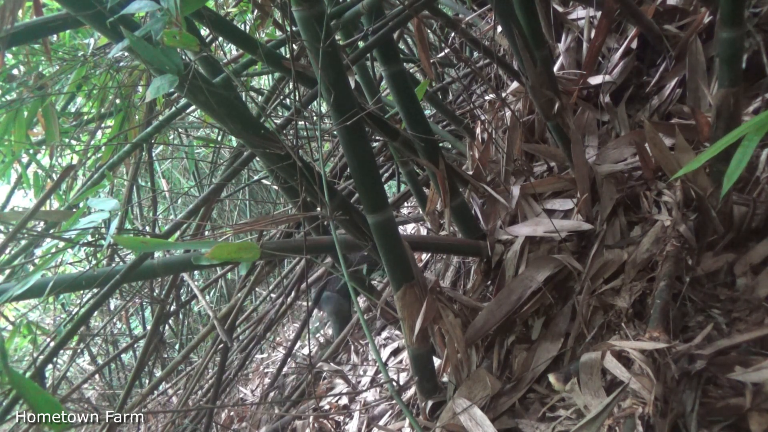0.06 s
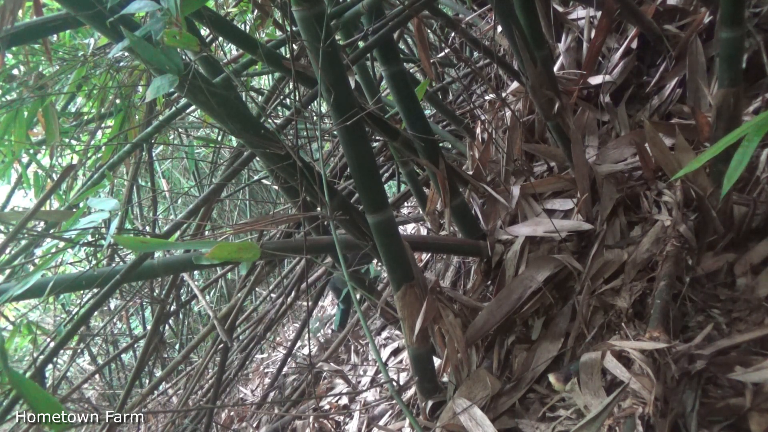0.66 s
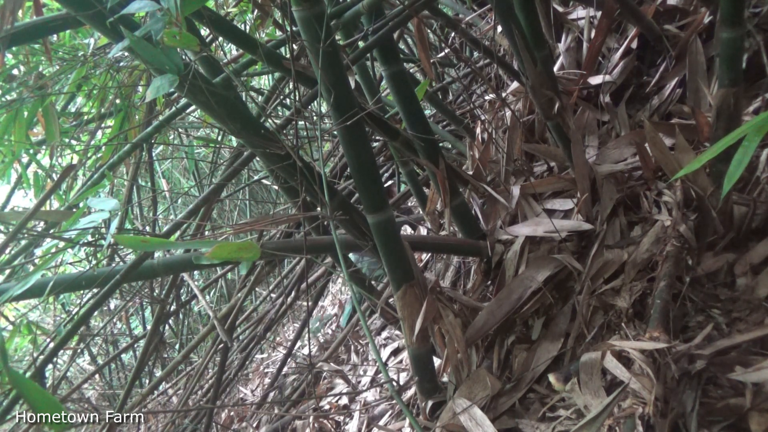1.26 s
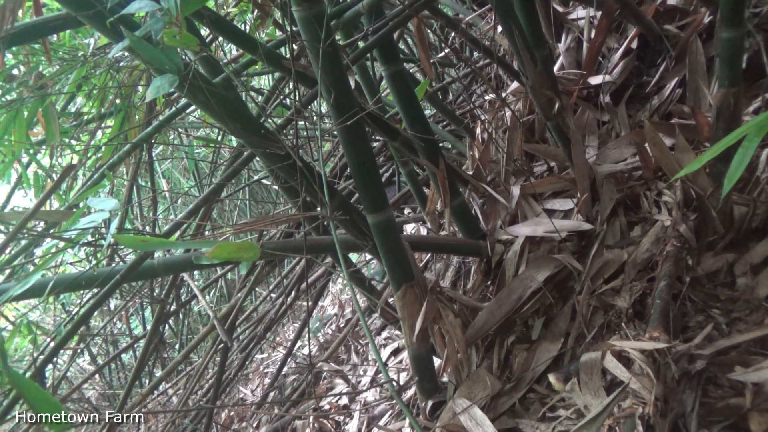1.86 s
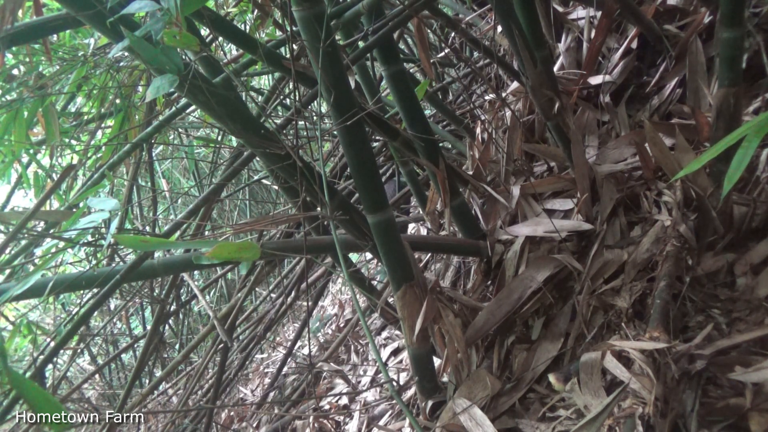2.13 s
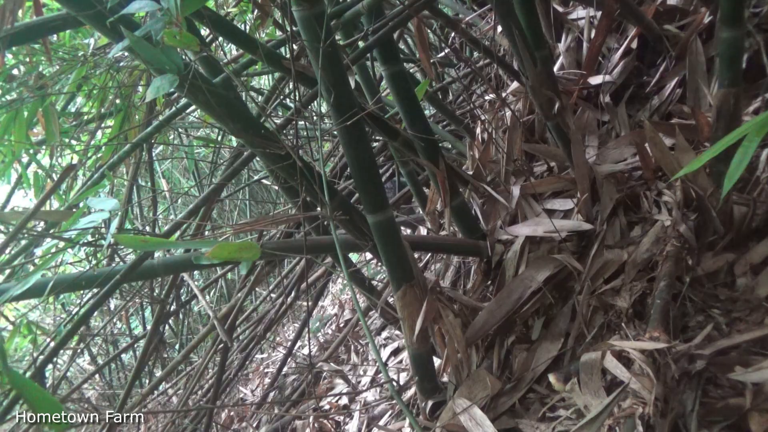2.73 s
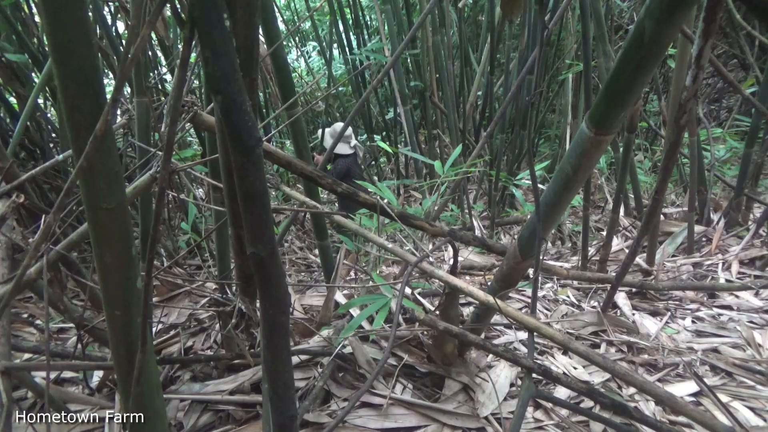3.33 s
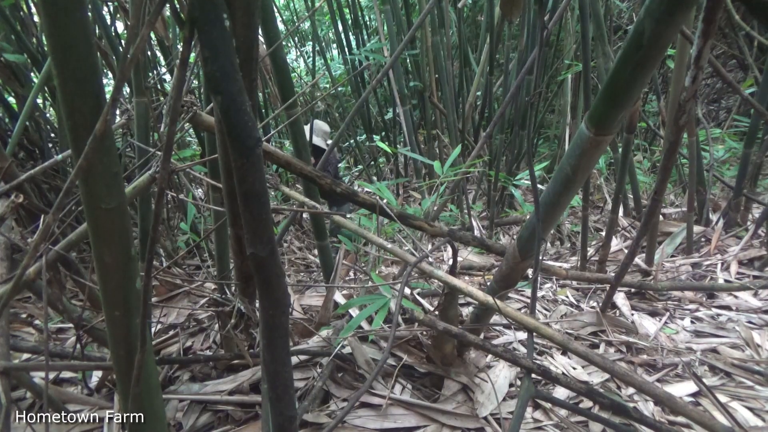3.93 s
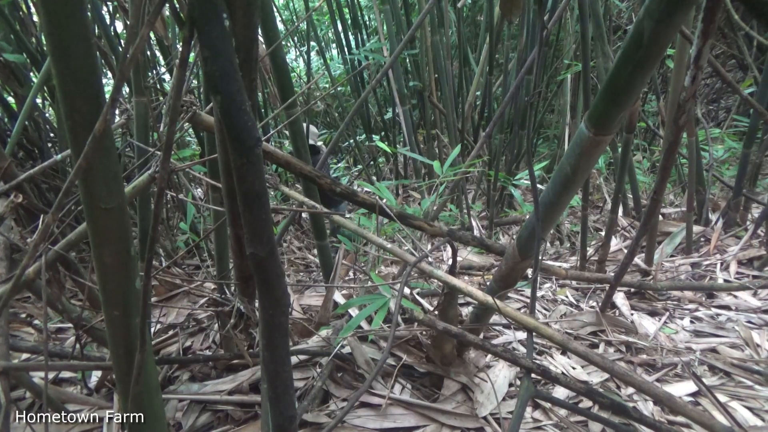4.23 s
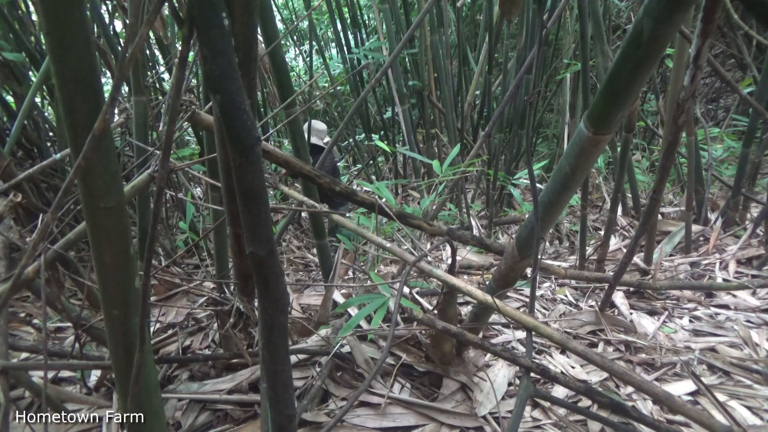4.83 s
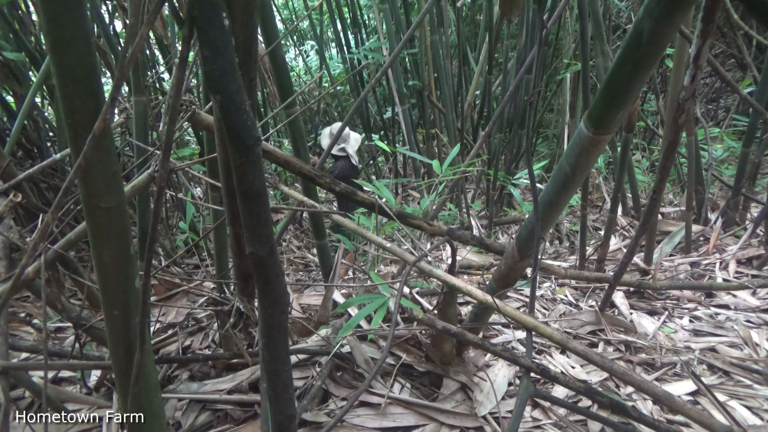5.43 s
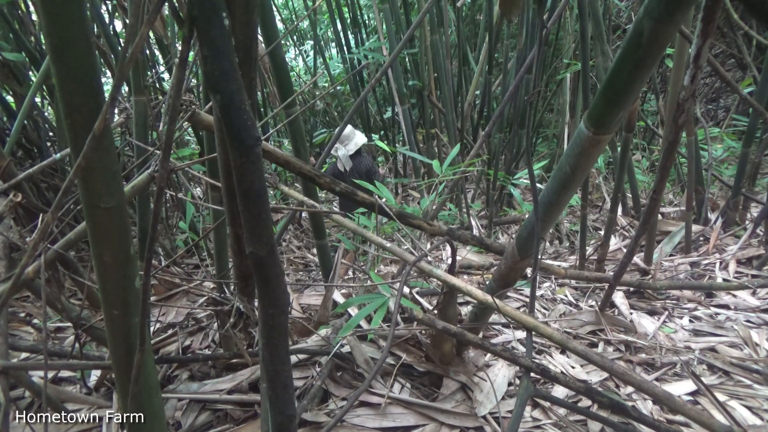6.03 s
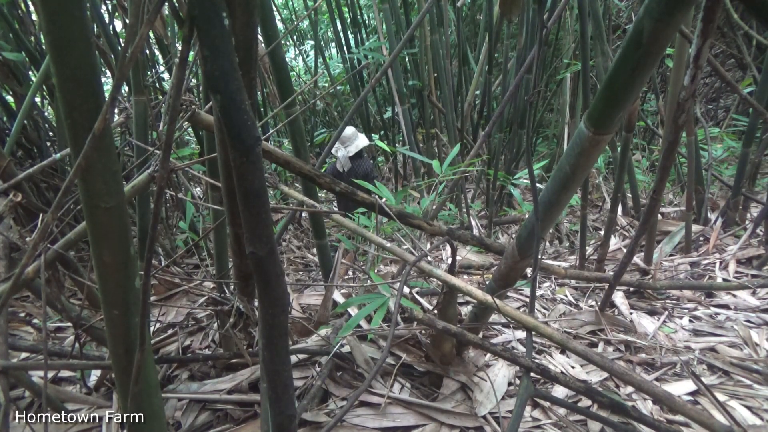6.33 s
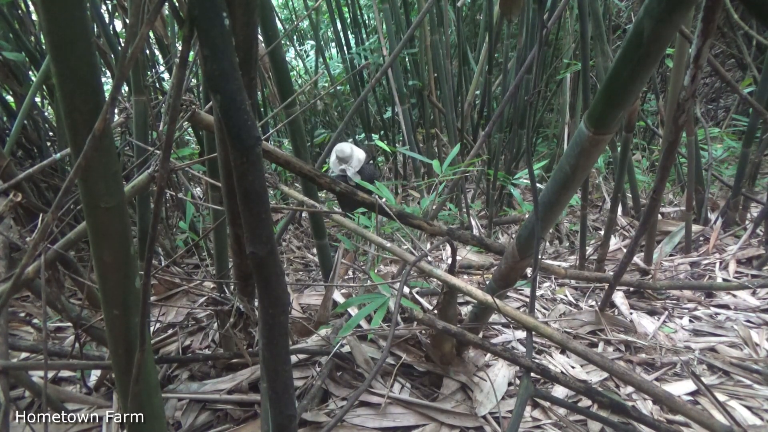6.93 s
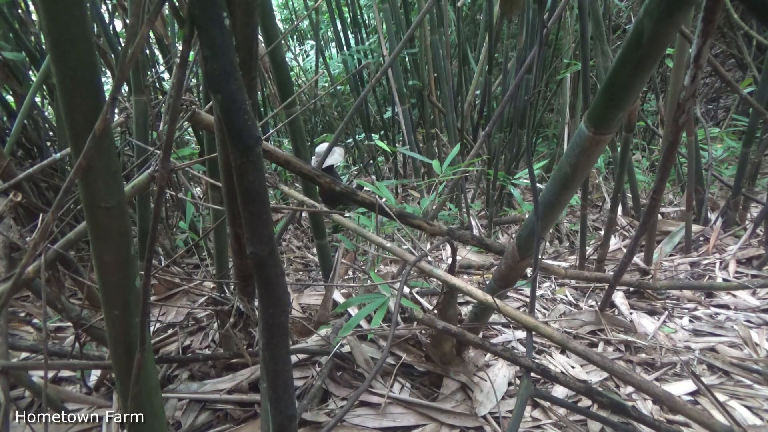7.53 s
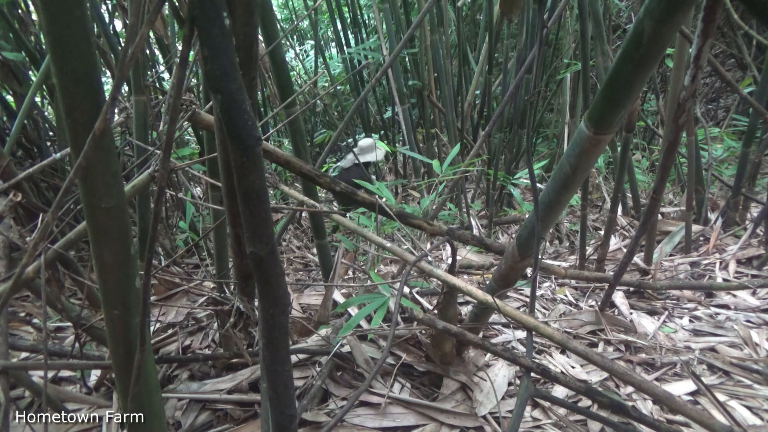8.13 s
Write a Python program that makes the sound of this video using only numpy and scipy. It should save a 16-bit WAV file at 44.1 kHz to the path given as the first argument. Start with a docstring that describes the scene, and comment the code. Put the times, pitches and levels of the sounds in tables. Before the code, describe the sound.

A high insect drone hangs over a bamboo grove as footsteps crunch through dry leaves some metres ahead, with sharp twig snaps and soft thuds. The background shifts slightly and a far bird begins whistling downward. Then a dry cane splinters loudly, groaning briefly as it splits, and the steps carry on with more rustling and cracking. The standing stems give each snap a short echo.

```python
"""Someone pushes through a bamboo grove some metres away: dry leaves rustle, twigs snap, feet thud.
After about 3 s the level dips briefly, the background shifts, and a far bird starts to whistle downward.
Midway a dead cane breaks, and its hollow groans upward as the split opens. Then the steps go on.
All along, insects drone high up and the standing canes scatter the sounds into short echoes."""
import sys
import numpy as np
from scipy import signal
from scipy.fft import rfft, irfft, next_fast_len
from scipy.io import wavfile
from scipy.ndimage import uniform_filter1d

SR = 44100
rng = np.random.default_rng(int(sys.argv[2]) if len(sys.argv) > 2 else 0)


def dump_mix(stems):
    """Bounce the given channels to the path in sys.argv[1] as a 16-bit WAV at rate SR."""
    frames = np.atleast_2d(stems).T  # one column per channel
    limited = np.clip(frames, -1, 1)  # hard clip at full scale
    pcm = np.round(limited * 32767).astype(np.int16)
    wavfile.write(sys.argv[1], SR, pcm)


N = 360297
TIME = np.arange(N) / SR

# steps and shoves through dry litter: (start [s], time pressing [s], leaf hiss [dB], stalk crunch [dB])
PUSHES = [(-0.2, 0.32, -44, -54), (0.235, 0.15, -39, -57.5), (0.52, 0.0092, -42, -50.5),
          (0.669, 0.061, -39, -49.5), (1.25, 0.11, -48.5, -53.5), (1.42, 0.14, -48.5, -60),
          (1.745, 0.021, -38, -55), (1.865, 0.057, -39, -51), (2.43, 0.15, -48, -66),
          (2.805, 0.11, -47, -79), (3.03, 0.043, -52, -57), (3.108, 0.026, -40, -54.5),
          (3.2, 0.047, -40, -52.5), (4.46, 0.034, -52.5, -54), (4.64, 0.068, -30, -35.5),
          (4.92, 0.07, -41.5, -43.5), (5.316, 0.021, -35.5, -44), (5.44, 0.041, -45.5, -69),
          (6.2, 0.17, -41.5, -53), (6.42, 0.058, -39, -49), (6.66, .2, -39, -54), (6.97, 0.046, -38.5, -51),
          (7.08, 0.25, -42, -53), (7.41, 0.19, -42, -56), (7.72, 0.17, -42, -55), (7.92, 0.031, -42.5, -51)]
# litter stirring between steps: (start [s], end [s], leaf hiss [dB], stalk crunch [dB])
STIRS = [(0, 2.7, -52, -68), (3.1, 17, -60.5, -68.5)]
# tone of dry leaves and of crushed stalks: (frequency [Hz], level [dB])
LEAF_TONE = [(500, -40), (2500, -16.5), (4300, -6.5), (5800, 0), (6700, -1.5), (8000, -4.5), (10000, -2.5),
             (12500, -8), (16000, -15.5)]
STALK_TONE = [(25, -38), (70, -5), (170, 2.5), (300, -3), (700, -1), (1200, -0.5), (2000, 3.5), (3200, 2),
              (5000, -2.5), (9000, -27)]
# twigs snapping: (time [s], crack [dB], woody knock [dB], splinter pitch [Hz], tearing time [s])
TWIG_SNAPS = [(0.529, -31, -51, 5940, .0037), (0.551, -25, -46, 6800, 0.0043),
              (0.694, -28.5, -49, 10100, 0.0078), (0.7257, -31, -49, 7140, 0.0024),
              (1.1372, -47, -65, 9800, .001), (1.636, -34, -54, 12000, 0.0022),
              (1.648, -25, -47, 6200, 0.0033), (1.7458, -16, -26, 4840, 0.0033),
              (2.812, -37, -58, 6350, .003), (3.2215, -25, -45, 9900, .0057),
              (4.1352, -40, -56, 7500, .0015), (6.268, -32.5, -43, 8050, .0045),
              (6.301, -25, -44, 6700, .0052), (6.492, -28, -42, 5800, 0.0093),
              (6.8259, -16, -39.5, 10300, 0.00069), (6.8406, -18.5, -54, 10200, 0.00043),
              (6.909, -28.5, -46, 6700, 0.0019), (7.019, -27.5, -44, 6170, .0023),
              (7.274, -28, -51, 9900, .0015), (7.309, -24.5, -41, 10300, .0027),
              (7.852, -30, -54, 7500, .001), (7.8652, -24, -55, 6240, 0.0018),
              (7.931, -29.5, -38, 5070, .001), (8.052, -32.5, -45, 9100, .0007),
              (8.1225, -37.5, -53, 9350, .0012)]
# the dead cane giving way:
# (time [s], crack [dB], woody knock [dB], splinter pitch [Hz], knock pitch [Hz], tearing time [s])
CANE_CRACKS = [(4.6313, -14, -23.5, 9200, 2210, 0.0024), (4.6517, -17, -23, 5300, 1150, .0028),
               (4.6543, -32, -14, 5700, 1780, 0.0054), (4.68, -17, -26, 5600, 1150, 0.0014),
               (4.6825, -20, -15, 5800, 1750, .009), (4.7289, -18, -30, 9500, 2530, .0014),
               (4.781, -24, -31, 6000, 1580, 0.0047), (4.825, -29, -26.5, 5700, 1820, 0.0052),
               (4.85, -32, -27, 5260, 1100, .01), (4.8907, -24, -34.5, 5360, 1150, 0.003),
               (4.921, -46, -28, 5160, 1680, .003), (4.9404, -35, -27, 5230, 1870, 0.0038),
               (4.9825, -31, -42, 8650, 2140, .0018), (5.1252, -24, -20.5, 6900, 1900, 0.0046)]
# stems tapping each other: (time [s], level [dB], knock pitch [Hz])
STEM_TAPS = [(1.043, -42.5, 2980), (1.2, -44, 1000), (2.18, -43.5, 2900), (2.663, -44.5, 2540)]
# tone of a crack: (frequency [Hz], level [dB])
CRACK_TONE = [(300, -16), (1500, -26), (3500, -5), (6000, 3), (9500, 4), (12000, 3.5), (16000, -5)]
# how the cane's cracks lose their highest treble over distance: (frequency [Hz], level [dB])
DISTANT_CRACK_TONE = [(8000, 1), (11000, -1.5), (15000, -19)]
# where the body of a dry cane rings: (pitch [Hz], width [Hz], level [dB])
CANE_RINGS = [(1110, 68, -2.5), (1630, 360, 3.5), (2730, 1060, 5.5), (4100, 640, 3.5)]
# the knocks carry little bass: (frequency [Hz], level [dB])
KNOCK_LOW_CUT = [(100, -9), (400, -3), (900, -2)]
# the split sticks and slips: (start [s], length [s], level [dB])
SPLIT_SLIPS = [(4.772, 0.079, -42.5), (4.886, 0.0096, -40), (4.92, 0.036, -43.5), (4.979, 0.061, -40.5),
               (5.065, 0.029, -56)]
# footfalls and knocks on soft ground: (time [s], level [dB], pitch [Hz], time to fade by 60 dB [s])
THUDS = [(1.748, -50, 139, 0.15), (4.656, -51, 112, 0.22), (4.685, -58, 181, 0.29),
         (5.127, -36, 226, 0.076), (6.5, -49, 125, .14), (6.535, -50, 72, 0.11), (7.03, -38.5, 375, 0.029),
         (7.31, -41, 222, 0.05)]
# bird calls: (start [s], length [s], level [dB], top pitch [Hz])
BIRD_CALLS = [(3.69, 0.3, -52, 4066), (4.462, 0.42, -49, 4195), (6.661, .28, -52, 4100),
              (7.474, 0.32, -52.5, 4050)]
# shape of one call: (way through [0 to 1], pitch [share of the top pitch], level [dB])
CALL_SHAPE = [(0, 0.99, -2), (.25, .86, 0.5), (.55, .79, -0.5), (.78, .67, 1), (.9, .61, 1), (1, .55, -6)]
# insect drones: (pitch [Hz], width [Hz], level by the bamboo clump [dB], level in the open grove [dB])
INSECTS = [(5190, 730, -60.5, -62), (4970, 750, -65, -58.5), (5800, 1200, -73, -72),
           (7060, 270, -74, -65.5)]
# tone of the air, its extra tint in the open grove, and tone of far leaves: (frequency [Hz], level [dB])
AIR_TONE = [(25, -23), (47, -10.5), (130, 0), (200, 1), (370, 0), (600, -5.5), (1300, -8.5), (2400, -9.5),
            (3300, -17)]
OPEN_AIR_TINT = [(200, -1.5), (400, 0.5), (800, 2), (2000, 1)]
FAR_LEAF_TONE = [(1500, -49), (2600, 7), (4200, 4.5), (6000, 11.5), (10000, 1.5), (13000, -7), (16000, -1)]
# how long the grove echoes: (frequency [Hz], time to fade by 60 dB [s])
ECHO_FADE = [(200, 1), (1500, 0.34), (5000, 0.38), (10000, 0.23), (16000, 0.11)]
# tone of the echoes: (frequency [Hz], level [dB])
ECHO_TONE = [(200, -26), (1500, -7), (5000, -4), (10000, -4.5), (16000, 4)]
# tone of the side signal, which makes the sound wide: (frequency [Hz], level [dB])
SIDE_TONE = [(100, -16), (300, -14.5), (700, -11.5), (1800, -33), (3500, -61), (6500, -17), (9000, -13),
             (12000, -34.5)]
# the low notes lean left: (frequency [Hz], left over right [dB])
LEFT_LEAN = [(100, 0), (350, 1.3), (1200, 0)]

SHIFT_S = 3.105  # the background switches from the clump to the open grove


def rustle(hiss, crunch, flutter_db=1.05, tick_db=-7):
    """Countless leaf edges brush in a fine fizz, a few tick alone, and thin stalks crunch below."""
    pitches = np.linspace(3000, 15000, 7)
    fizz = sum(resonate(clicks(5000, 2.0), hz, 3600) * gain_of(2.63 * wander(45)) for hz in pitches)
    ticks = sum(resonate(clicks(70, 2.8), hz, 2500) for hz in pitches)
    leaves = evened(coloured(evened(fizz) + gain_of(tick_db) * evened(ticks), LEAF_TONE))
    stalks = evened(coloured(clicks(1400, 4.2), STALK_TONE))
    return (leaves * hiss + stalks * crunch) * gain_of(flutter_db * wander(70))


def litter_levels(curve=0.55, settle_db=-15):
    """Loudness of leaves and of stalks: each push swells, springs back and settles, over a faint stir."""
    power = np.zeros((2, N))
    for start, length, hiss_db, crunch_db in PUSHES:
        push = swell(start, length, curve, fade_db_per_s=118)
        settling = gain_of(settle_db) * swell(start, length, curve, fade_db_per_s=25)
        power += gain_of([[hiss_db], [crunch_db]]) ** 2 * (push ** 2 + settling ** 2)
    for start, end, hiss_db, crunch_db in STIRS:
        power += gain_of([[hiss_db], [crunch_db]]) ** 2 * ((TIME >= start) & (TIME < end))
    return np.sqrt(power)


def snaps(twig_knock_hz=2230, tap_s=0.0023):
    """Twigs crack brightly, the dead cane cracks with a woody body, and touching stems only knock."""
    out = np.zeros(N)
    for start, crack_db, knock_db, splinter_hz, length in TWIG_SNAPS:
        fibres = tear(length)
        knock_hz = twig_knock_hz * np.exp(rng.uniform(-0.03, 0.03))
        add(out, start, crack(fibres, crack_db, splinter_hz) + knock(fibres, knock_db, knock_hz))
    for start, crack_db, knock_db, splinter_hz, knock_hz, length in CANE_CRACKS:
        fibres = tear(length)
        far_crack = coloured(crack(fibres, crack_db, splinter_hz), DISTANT_CRACK_TONE)
        add(out, start, far_crack + knock(fibres, knock_db, knock_hz))
    for start, db, knock_hz in STEM_TAPS:
        add(out, start, knock(tear(tap_s), db, knock_hz))
    return out


def tear(length, rise_s=0.0002):
    """Wood fibres part in one quick, harsh burst; a few hold on longer."""
    t = np.arange(4096) / SR
    fibres = np.tanh(rng.standard_normal(len(t)) / 0.15) * (1 - np.exp(-t / rise_s))
    stragglers = 0.25 * np.exp(-t / (3.7 * length))
    return fibres * (np.exp(-(t / length) ** 2) + stragglers)


def crack(fibres, db, hz, ring_db=11):
    """The parting fibres make a splinter ring brightly."""
    ringing = fibres + gain_of(ring_db) * resonate(fibres, hz, width=2000)
    return burst(coloured(np.roll(ringing, 16), CRACK_TONE), db)


def knock(fibres, db, hz, stem_width_hz=170, stem_db=4.0, kick=2.4):
    """The break kicks the stem and the cane behind it; a thin stem knocks high and barely stirs a cane."""
    push = np.diff(fibres, prepend=0)
    push[0] += kick
    thin_loss_db = 20 * max(np.log2(hz / 1750), 0)
    rings = [(f, width, level - thin_loss_db) for f, width, level in CANE_RINGS]
    rings.append((hz, stem_width_hz, stem_db))
    body = sum(gain_of(level) * evened(resonate(resonate(push, f, width), f, f))
               for f, width, level in rings)
    padded = np.pad(body, (0, len(body)))
    return burst(coloured(padded, KNOCK_LOW_CUT)[:len(body)], db)


def groan(start_s=4.77, opening_s=0.35, shut_hz=381, open_hz=573, wall_db=-12, rasp_db=-9):
    """Fibres slip in the split and sound the cane's hollow, which rises in pitch as it opens."""
    opening = np.clip((TIME - start_s) / opening_s, 0, 1) ** 0.66  # fast at first, then slower
    pitch = shut_hz + (open_hz - shut_hz) * opening
    cycles = np.cumsum(pitch * (1 + 0.06 * wander(250))) / SR
    slips = np.diff(np.floor(cycles), prepend=0) * gain_of(2.9 * wander(300))  # one click a cycle
    rough = np.interp(TIME, [4.95, 5.02], [0.7, 0.3])  # ragged slips settle into a steady squeak
    rubbing = (1 - rough) * evened(slips - slips.mean()) + rough * evened(clicks(650, 2.5))
    hollow = resonate(resonate(rubbing, pitch, 130), pitch, 130)
    hollow /= np.sqrt(abs(uniform_filter1d(hollow ** 2, size=900)) + 1e-12)  # steadies its loudness
    wall = evened(resonate(resonate(rubbing, 1126, 85), 1060, 80))
    rasp = evened(resonate(rubbing, 1970, 600))
    level = sum(gain_of(db) * swell(start, length, curve=0.5, fade_db_per_s=752)
                for start, length, db in SPLIT_SLIPS)
    return level * (hollow + gain_of(wall_db) * wall + gain_of(rasp_db) * rasp)


def thuds(rise_s=0.0015):
    """Soft ground answers a step or knock with a short, dull thump."""
    out, t = np.zeros(N), np.arange(SR // 2) / SR
    for start, db, hz, fade_s in THUDS:
        cycles = np.cumsum(hz * (1 + 0.35 * wander(hz)[:len(t)])) / SR  # loose litter has no clean pitch
        level = gain_of(db - 60 * t / fade_s) * (1 - np.exp(-t / rise_s))
        add(out, start, level * np.sin(2 * np.pi * cycles))
    return out


def bird(flutter_db=2):
    """A wavering whistle that slides down, blurred by its long way through the canes."""
    out = np.zeros(N)
    way, slide, shape_db = np.transpose(CALL_SHAPE)
    for start, length, db, top_hz in BIRD_CALLS:
        n = int(length * SR)
        progress = np.linspace(0, 1, n)
        pitch = top_hz * np.interp(progress, way, slide) * (1 + 0.022 * wander(260)[:n])
        level = gain_of(db + np.interp(progress, way, shape_db) + flutter_db * wander(93.4)[:n])
        add(out, start, level * signal.windows.tukey(n, 0.1) * np.sin(2 * np.pi * np.cumsum(pitch) / SR))
    return out


def grove_echoes(sounds, paths_per_s=7000, rise_s=0.0005):
    """Standing canes on three sides scatter what reaches them; the paths change as the source moves."""
    out, t = np.zeros(N), np.arange(SR * 3 // 4) / SR
    for direction, sound in enumerate(sounds):
        bounces = rng.standard_normal(len(t)) * (rng.random(len(t)) < paths_per_s / SR)
        bounces *= 1 - np.exp(-t / rise_s)
        hz, age, bands = signal.stft(bounces, SR, nperseg=256)
        fade = gain_of(-60 * age / value_at(ECHO_FADE, hz)[:, None])
        tail = signal.istft(bands * fade, SR, nperseg=256)[1]
        share = np.cos(np.pi * (7 * TIME + direction / 3)) * np.sqrt(2 / 3)  # the sides take turns
        out += signal.fftconvolve(sound * share, tail / np.linalg.norm(tail))[:N]
    return coloured(out, ECHO_TONE)


def insects_and_air(clump_air_db=-57, open_air_db=-57.5, far_leaves_db=-58):
    """A chorus of insects blurs into narrow bands of hiss, over low air and far leaves."""
    in_open, size = TIME > SHIFT_S, next_fast_len(N)
    hz = np.fft.rfftfreq(size, 1 / SR)
    air = evened(coloured(rng.standard_normal(N), AIR_TONE)) * gain_of(0.087 * wander(8.9))
    out = np.where(in_open, gain_of(open_air_db) * coloured(air, OPEN_AIR_TINT), gain_of(clump_air_db) * air)
    far_leaves = evened(coloured(rng.standard_normal(N), FAR_LEAF_TONE))
    out += far_leaves * gain_of(far_leaves_db + 2.9 * wander(3.92))
    for pitch, width, clump_db, open_db in INSECTS:
        band = rfft(rng.standard_normal(size)) / (1 + 2 * ((hz - pitch) / width) ** 2) ** 2
        out += evened(irfft(band)[:N]) * gain_of(np.where(in_open, open_db, clump_db) + wander(30))
    return out


def gain_of(db):
    """Turns decibels into a number to multiply by."""
    return 10 ** (np.asarray(db) / 20)


def evened(x):
    """Scales a sound to an average power of 1."""
    return x / np.sqrt(np.mean(x ** 2) + 1e-20)


def burst(x, db):
    """Sets a short sound's level, as if all its energy came within 1 ms."""
    return gain_of(db) * evened(x) * np.sqrt(SR / 1000 / len(x))


def value_at(points, hz):
    """Reads a table between its frequencies, with octaves evenly spaced."""
    f, value = np.transpose(points)
    return np.interp(np.log(hz + 1), np.log(f + 1), value)


def add(mix, start_s, sound):
    """Mixes a sound in at a given time."""
    part = mix[max(round(start_s * SR), 0):][:len(sound)]
    part += sound[:len(part)]


def coloured(x, tone):
    """Turns each frequency up or down as a tone table says."""
    size = next_fast_len(len(x))
    gains = gain_of(value_at(tone, np.fft.rfftfreq(size, 1 / SR)))
    return irfft(rfft(x, size) * gains, size)[:len(x)]


def resonate(x, hz, width):
    """Rings at a fixed or moving pitch; a smaller width (in Hz) rings longer."""
    spin = np.exp(2j * np.pi * np.cumsum(hz * np.ones(len(x))) / SR)
    decay = np.exp(-np.pi * width / SR)
    return 2 * (spin * signal.lfilter([1 - decay], [1, -decay], x / spin + 1e-18)).real


def wander(per_s):
    """A random drift of typical size 1 that heads for a new value per_s times a second."""
    return evened(np.interp(TIME * per_s, np.arange(N), rng.standard_normal(N)))


def clicks(per_s, spread_db):
    """Random clicks, most small and a few large."""
    size = gain_of(spread_db * np.minimum(rng.exponential(1, N), 4))
    return size * rng.choice([-1, 1], N) * (rng.random(N) < per_s / SR)


def swell(start, length, curve, fade_db_per_s):
    """A loudness that grows while the weight presses, then dies away."""
    pressed = np.clip((TIME - start) / length, 0, 1)
    return pressed ** curve * gain_of(-fade_db_per_s * np.maximum(TIME - start - length, 0))


def scene(leaves_to_echo_db=-10, bird_direct_db=-13, wood_left=0.013):
    """Everything comes from ahead, the breaking wood a little from the left."""
    # a low cut takes the deepest bass out of the snaps, groan and thuds
    low_cut = signal.butter(2, 75, "highpass", fs=SR, output="sos")
    hiss, crunch = litter_levels()
    leaves, whistle, low_sounds = rustle(hiss, crunch), bird(), groan() + thuds()
    # a snap sounds different in each direction: one comes straight to us, three go into the canes
    wood, *sideways = [signal.sosfilt(low_cut, snaps() + low_sounds) for _ in range(4)]
    echoes = grove_echoes([x + whistle + gain_of(leaves_to_echo_db) * leaves for x in sideways])
    middle = wood + leaves + gain_of(bird_direct_db) * whistle + echoes + insects_and_air()
    all_around = grove_echoes(sideways) + rustle(hiss, crunch) + insects_and_air()
    shifted = signal.hilbert(middle, next_fast_len(N)).imag[:N]  # every wave a quarter cycle later
    side = coloured(0.57 * shifted + 0.41 * all_around, SIDE_TONE)
    side += wood_left * wood + (coloured(middle, LEFT_LEAN) - middle) / 2
    return np.array([middle + side, middle - side])


def record(dry, dip_depth=0.8, dip_s=0.007, top_hz=15950):
    """The level dips briefly as the background shifts, and the very highest treble is cut off."""
    dip = 1 - dip_depth * np.exp(-((TIME - SHIFT_S) / dip_s) ** 2)
    high_cut = signal.firwin(511, top_hz, window=("kaiser", 9), fs=SR)
    return signal.oaconvolve(dry * dip, high_cut[None], "same")


dry = scene()
out = record(dry)
dump_mix(out)
```